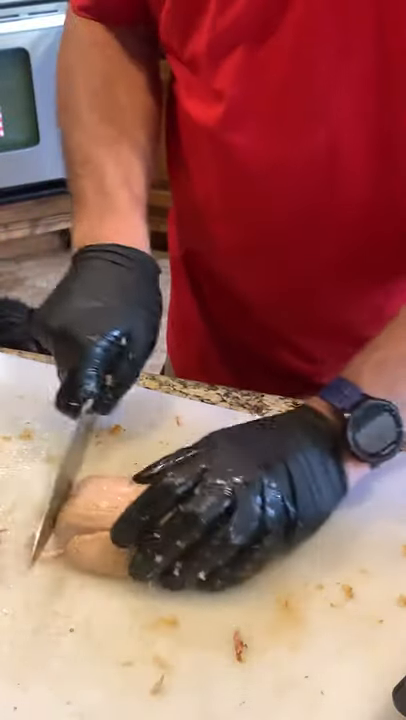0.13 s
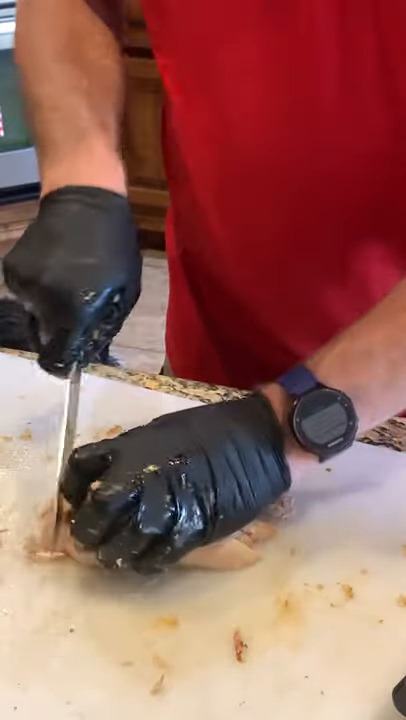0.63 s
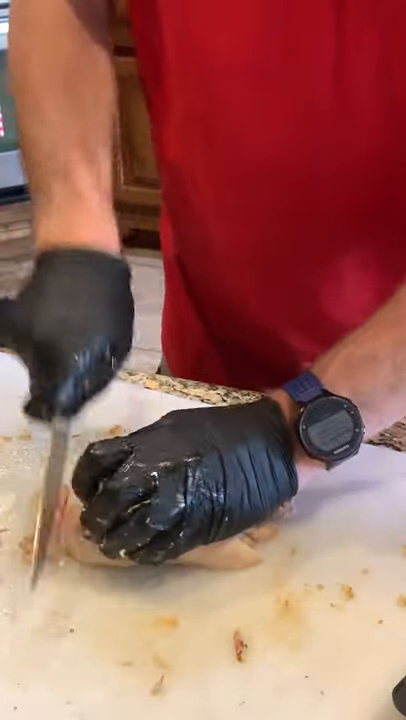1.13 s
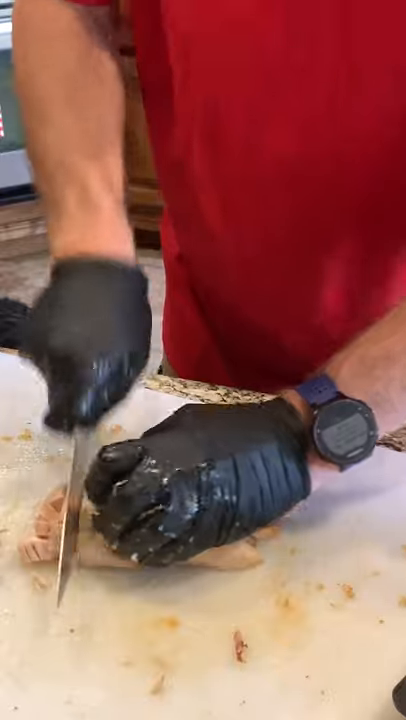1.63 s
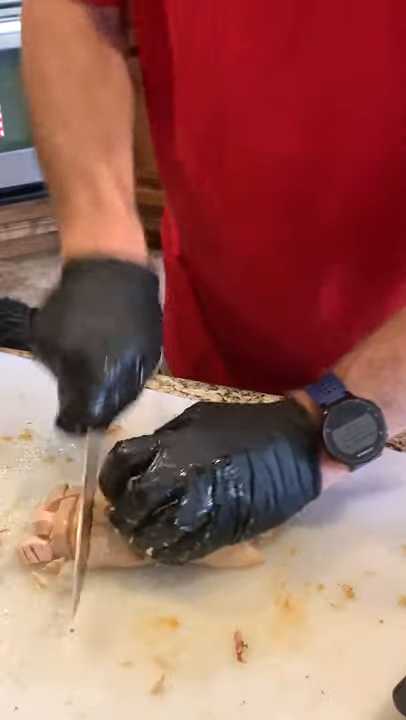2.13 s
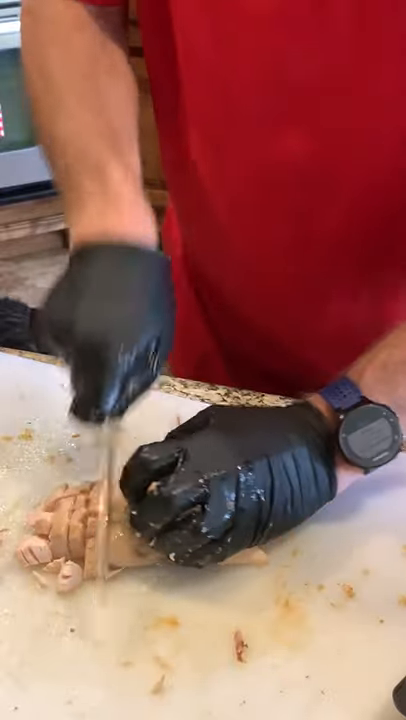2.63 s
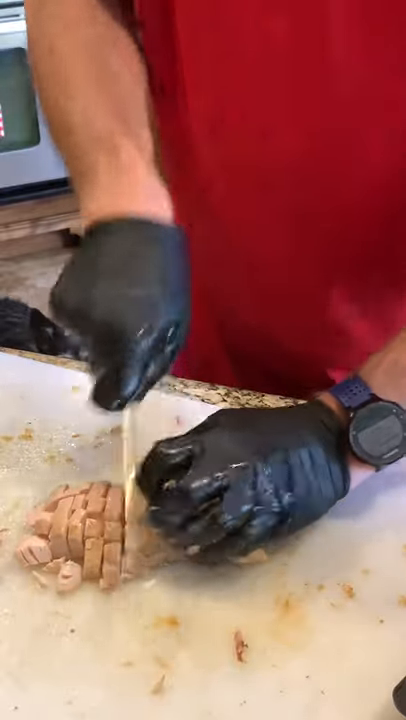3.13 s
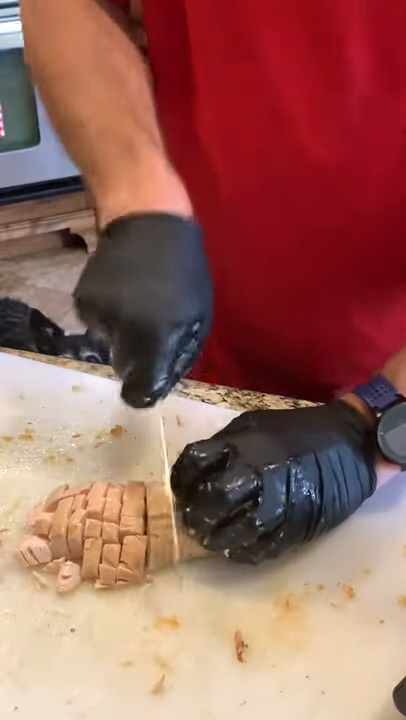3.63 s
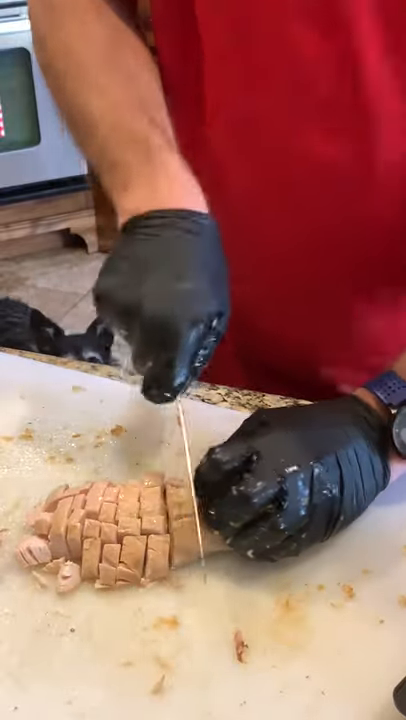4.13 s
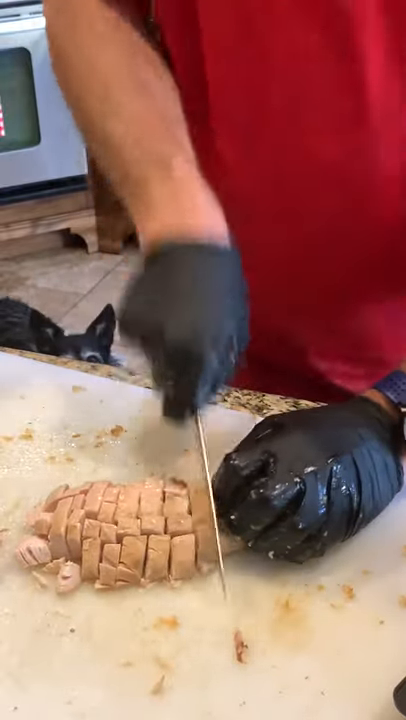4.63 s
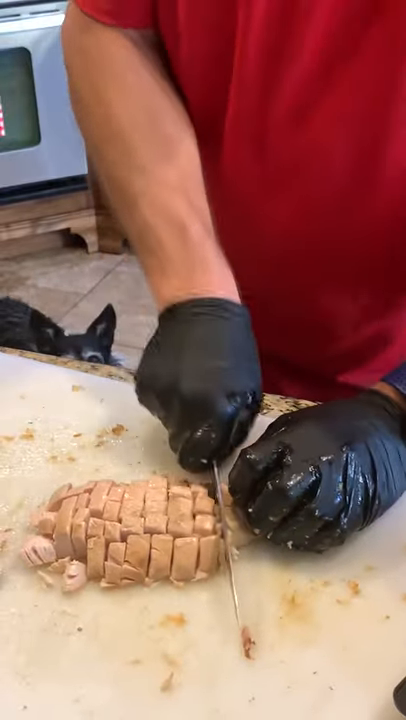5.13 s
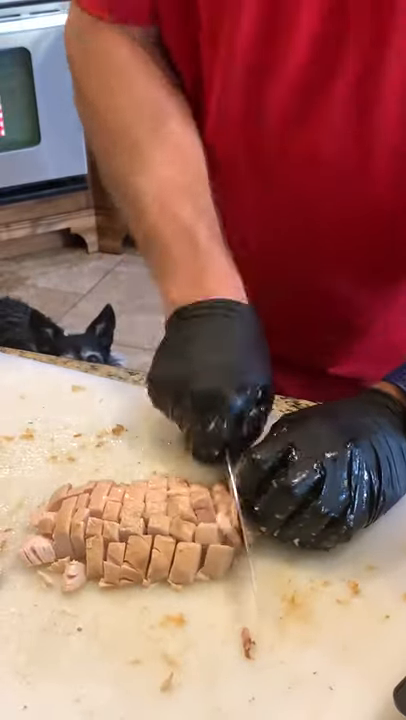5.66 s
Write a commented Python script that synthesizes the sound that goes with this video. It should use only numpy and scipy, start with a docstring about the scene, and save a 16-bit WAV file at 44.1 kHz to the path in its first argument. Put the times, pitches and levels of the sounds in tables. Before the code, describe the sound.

Close recording of dicing cooked chicken on a plastic board over a stone counter. After faint hand rustle and a thin squeak, firm clacking knocks come at an even pace to the end, the second loudest, others uneven in strength. Each slices in with a brief moist hiss, then the board settles with a faint low thump. Tiny sticky ticks fill gaps; hard walls answer briefly.

```python
"""Dicing meat on a kitchen board

A knife dices cooked meat on a plastic board lying on a stone counter in a hard-walled kitchen.
Each chop hisses through the meat (grainy noise), knocks the board (a force pulse on decaying modes) and
rings round the room (echoes and a noise tail). The counter thuds at two low modes as the board is struck
and again as it settles. Wet gloves and meat tick in noise bursts, over room rumble and faint narrow whines.
"""
import sys
import numpy as np
from scipy import signal
from scipy.fft import rfft, irfft
from scipy.io import wavfile
from scipy.ndimage import uniform_filter1d

SR = 44100
rng = np.random.default_rng(int(sys.argv[2]) if len(sys.argv) > 2 else 0)


def level_to_linear(level):
    """Convert decibel levels to linear amplitude factors, elementwise."""
    exponent = np.asarray(level, float) / 20
    return 10 ** exponent


def to_wav(s):
    """Save 16-bit WAV."""
    ch = np.atleast_2d(s).T  # columns
    pcm = np.round(np.clip(ch, -1, 1) * 32767)  # PCM
    wavfile.write(sys.argv[1], SR, pcm.astype(np.int16))


N = 254571

# Blade on board. Each row: nominal start in seconds, knock peak in dB, main board ring in Hz,
# contact in ms, edge click gain in dB against the knock peak.
CHOPS = [(0.86, -9.5, 1502, 0.66, -39.5), (1.4, -1.5, 1502, 0.33, -37), (1.888, -6, 1510, 0.57, -40.5),
         (2.378, -5.5, 1507, 0.45, -41), (2.867, -9, 1530, 0.58, -50), (3.307, -13, 1496, 0.65, -39),
         (3.777, -7, 1472, 0.43, -37.5), (4.264, -10.5, 1490, 0.55, -35.5), (4.683, -9, 1465, 0.33, -34.5),
         (5.075, -15.5, 1478, 0.63, -37), (5.585, -9.5, 1508, 0.48, -34)]
# Board modes. Each row: frequency in Hz at the usual spot, relative level in dB, t60 in seconds.
BOARD_MODES = [(224.2, -10.5, 0.036), (410, -12.5, 0.018), (533, -7.5, 0.026), (830, -17, 0.028),
               (877, -12.5, 0.013), (947, -27.5, 0.046), (950, -33.5, 0.053), (1170, -26.5, 0.011),
               (1490.6, 1, 0.0066), (1720, -11.5, .018), (1770, -5.5, 0.0073), (2280, -27.5, 0.0085),
               (2876, -22.5, 0.012)]
# First swing of each board mode: 1 towards the listener, -1 away.
MODE_SIGNS = [-1, -1, -1, -1, -1, -1, 1, 1, 1, -1, 1, 1, 1]
# Brief ring of the blade edge. Each row: frequency in Hz, level in dB before the click gain.
EDGE_MODES = [(3200, -20.5), (3800, 16), (4800, 14), (6000, 11), (7500, 5.5), (9500, -28.5), (12000, -11.5)]
# Nearest surfaces. Each row: delay in seconds, relative level in dB.
ECHOES = [(.0027, -14.5), (.0055, -12.5), (0.0101, -11), (0.0114, -4.5), (0.0211, -14), (0.023, -30.5),
          (.034, -21.5), (.045, -25)]
# Room tail. Each row: frequency in Hz, relative level in dB, t60 in seconds.
ROOM_TAIL = [(150, -24, 0.71), (270, 12, 0.45), (390, 7, 0.48), (527, -0.5, 0.66), (682, -17, 0.92),
             (958, 7.5, 0.55), (1236, -7.5, 0.71), (1550, -4, 0.73), (2060, -3.5, 0.77), (3670, 0.5, 0.41),
             (4670, -6, 0.59), (8330, 6.5, 0.11), (15000, 7, 0.15)]
# Board settling on the counter. Each row: nominal start in seconds, level in dB,
# length in seconds, deep push from 0 to 1.
SETTLES = [(0.963, -32.5, 0.088, 0.94), (1.482, -32, 0.09, 0.6), (1.986, -35, 0.089, 0.7),
           (2.459, -34.5, 0.077, 0.7), (2.914, -37, 0.084, 0.64), (3.38, -34, 0.099, 0.93),
           (3.849, -36.5, 0.069, 0.75), (4.316, -32.5, 0.075, 0.5), (4.737, -37, 0.035, 0.43),
           (5.659, -43.5, 0.074, 0.99)]
# Strokes through the meat, the first a hand shifting on it. Each row: loudest moment in seconds,
# nominal treble level in dB, swell in dB/s, fade in dB/s.
STROKES = [(0.299, -75, 58, 48), (0.927, -60.5, 144, 116), (1.435, -63, 163, 40), (1.925, -62, 158, 119),
           (2.39, -57, 214, 250), (2.861, -61.5, 153, 165), (3.326, -58, 172.5, 257),
           (3.797, -58, 225, 260), (4.278, -58.5, 259, 302), (4.7, -58.5, 246, 202), (5.098, -65, 141, 194),
           (5.616, -64.5, 209, 130)]
# Slicing spectrum. Each row: frequency in Hz, relative density in dB per Hz.
SLICE_SPECTRUM = [(1500, 5.5), (3000, 2.5), (6000, -2), (10000, -5), (16000, -13)]
# Clearest ticks of gloves and meat. Each row: start in seconds, direct peak in dB, centre in Hz,
# spectrum in dB one width above the centre.
TICKS = [(0.0483, -47.5, 5220, -9.5), (0.2283, -46, 6100, -3), (0.5437, -49, 9800, -20),
         (0.5634, -48, 5940, -11), (0.595, -58, 7750, -16), (0.631, -49.5, 6450, -6),
         (0.9353, -34, 4750, -21), (1.3706, -48.5, 5770, 2), (1.4573, -21.5, 4900, -20),
         (1.8451, -50, 7610, -14), (1.9259, -44.5, 6720, -39.5), (2.301, -49.5, 6300, -34),
         (2.321, -44.5, 5280, -5), (2.364, -36.5, 7100, -23.5), (2.487, -47, 5900, -4),
         (2.7575, -49.5, 5940, -13), (2.818, -50.5, 5860, -16), (2.982, -48, 7800, -27),
         (3.2519, -48, 5130, -7), (3.633, -50, 5600, -8), (3.7106, -48, 8560, -10), (3.756, -44, 6840, -37),
         (4.0593, -53.5, 10000, -9), (4.2002, -46.5, 6360, -17), (4.4685, -50, 7600, -9.5),
         (4.6488, -42.5, 6420, 5.5), (4.8673, -48.5, 10900, -14), (5.0259, -46, 5200, -26.5),
         (5.1008, -38.5, 5160, -40), (5.539, -55.5, 7920, -15)]
# Narrow whines. Each row: start in seconds, length in seconds, level in dB before stutter and fade,
# frequency in Hz.
WHINES = [(0.222, 0.055, -58.5, 1870), (0.292, 0.11, -60.5, 1865), (0.418, 0.12, -65, 1870),
          (0.539, 0.09, -67, 1860), (0.632, 0.14, -69.5, 1890), (2.745, 0.16, -62, 1840),
          (1.06, 0.32, -72.5, 4460), (1.6, 0.18, -70, 4430)]
# Room rumble. Each row: frequency in Hz, relative density in dB per Hz.
RUMBLE_SPECTRUM = [(12, -48), (20, -6), (113, -3), (130, -9), (172, -11), (210, -23), (228, -6.5),
                   (270, -14.5), (301, -7), (399, -17.5), (660, -22.5), (759, -21), (1190, -25),
                   (3250, -31.5), (16000, -48)]


def rms_one(x):
    """Scale to rms 1."""
    return x / np.sqrt(np.mean(x ** 2) + 1e-20)


def at_hz(points, hz, column=1):
    """Interpolate a table column on a log-frequency axis."""
    table = np.array(points)
    return np.interp(np.log(hz), np.log(table[:, 0]), table[:, column])


def coloured(points, size):
    """Noise with the given spectrum, rms 1."""
    hz = np.maximum(np.arange(size // 2 + 1) * SR / size, 1)
    spectrum = rfft(rng.standard_normal(size)) * level_to_linear(at_hz(points, hz))
    return rms_one(irfft(spectrum, size))


def add(out, sound, start_s):
    """Mix a sound in at its start time."""
    i = max(round(start_s * SR), 0)
    out[i:i + len(sound)] += sound[:N - i]


def spot_gain_db(hz, contact_ms, ring_hz):
    """Contact length and striking spot tilt the drive of low, middle and high board modes."""
    longer_ms = contact_ms - 0.46   # a longer, flatter landing drives the outer modes more
    higher_hz = ring_hz - 1510.6    # spots that ring higher drive the middle and high modes more
    if hz < 700:
        return 1.46 + 5.5 * longer_ms
    if 700 < hz < 1150:
        return 0.08 * higher_hz
    if hz > 2000:
        return 67 * longer_ms + 0.0666 * higher_hz
    return 0


def edge_click(t, rise_s=0.00015, t60_s=0.0061):
    """The blade edge rings as short bright decaying sines."""
    ring = sum(level_to_linear(db) * np.sin(2 * np.pi * hz * t) for hz, db in EDGE_MODES)
    return (1 - np.exp(-(t / rise_s) ** 2)) * level_to_linear(-60 * t / t60_s) * ring


def knocks(delay_s=0.00067, spread_db=1.4, allpass=0.915, allpass_count=6):
    """A smooth force pulse rings the board modes; the edge adds a click. One (start, sound) a chop."""
    t, sounds = np.arange(SR // 5) / SR, []
    main_hz = max(BOARD_MODES, key=lambda mode: mode[1])[0]
    click = edge_click(t)
    chance = rng.standard_normal((len(CHOPS), len(BOARD_MODES)))
    for (start_s, peak_db, ring_hz, contact_ms, click_db), luck in zip(CHOPS, chance):
        force = np.sin(np.pi * np.clip(1000 * t[:99] / contact_ms, 0, 1)) ** 2
        modes = np.zeros(len(t))
        for (hz, db, t60_s), sign, g in zip(BOARD_MODES, MODE_SIGNS, luck):
            gain_db = db + spot_gain_db(hz, contact_ms, ring_hz) + spread_db * g
            ring = np.sin(2 * np.pi * hz * ring_hz / main_hz * t)
            modes += sign * level_to_linear(gain_db - 60 * t / t60_s) * ring
        knock = np.diff(np.convolve(force, modes)[:len(t)], prepend=0)
        for _ in range(allpass_count):   # bending waves: highs arrive first, lows trail
            knock = signal.lfilter([-allpass, 1], [1, -allpass], knock)
        sound = knock / np.abs(knock).max() + level_to_linear(click_db) * click
        sounds.append((start_s + delay_s, level_to_linear(peak_db) * sound))
    return sounds


def room_response(tail_db=-32, build_s=0.002, echo_hz=1600, length_s=0.8, alike=0.45):
    """Dull near echoes, then a dense tail whose bands die at their own rates; partly alike between spots."""
    t = np.arange(round(length_s * SR)) / SR
    edges_hz = 100 * 2 ** (np.arange(23) / 3)   # third octaves
    white = rng.standard_normal((2, len(CHOPS) + 1, len(t)))
    # in the last response both parts are the same noise, so its tail is stronger
    white = np.sqrt(alike) * white[:, :1] + np.sqrt(1 - alike) * white[:, ::-1]
    tail = 0
    for k, (low_hz, high_hz) in enumerate(zip(edges_hz, edges_hz[1:])):
        hz = np.sqrt(low_hz * high_hz)
        band_filter = signal.butter(2, [low_hz, high_hz], "band", fs=SR, output="sos")
        band = signal.sosfilt(band_filter, white[k % 2])
        tail = tail + band * level_to_linear(at_hz(ROOM_TAIL, hz) - 60 * t / at_hz(ROOM_TAIL, hz, column=2))
    echoes = np.zeros(len(t))
    for delay_s, db in ECHOES:
        echoes[round(delay_s * SR)] += level_to_linear(db)
    echoes = signal.lfilter(*signal.butter(1, echo_hz, fs=SR), echoes)
    return echoes + level_to_linear(tail_db) * tail * (1 - np.exp(-(t / build_s) ** 2))


def kitchen(small, chop_room_db=-2.5, small_room_db=-8):
    """Sum chops and small sounds, each direct and convolved with a room response."""
    *chop_rooms, small_room = room_response()
    out = small + level_to_linear(small_room_db) * signal.fftconvolve(small, small_room)[:N]
    for (start_s, sound), room in zip(knocks(), chop_rooms):
        add(out, sound, start_s)
        add(out, level_to_linear(chop_room_db) * signal.fftconvolve(sound, room), start_s)
    return out


def thuds(rise_s=0.008, fall_s=0.021, fade_s=0.11, push_s=0.0096, partner_ratio=1.25, partner_db=-9):
    """The counter hums at two close low modes while the board presses; a deeper push starts each thud."""
    out, t = np.zeros(N), np.arange(SR // 4) / SR
    # strike level follows the chop: 0.61 dB per dB, -33.5 dB at a 0 dB chop
    strikes = [(s, -33.5 + 0.61 * db, 116.1, 0.078, 0.1) for s, db, *_ in CHOPS]
    settles = [(s, db, 109.5, length_s, push) for s, db, length_s, push in SETTLES]
    for start_s, level_db, hz, length_s, push in strikes + settles:
        release = 1 + np.exp((t - length_s) / fall_s)
        hold = (1 - np.exp(-(t / rise_s) ** 2)) * np.exp(-t / fade_s) / release
        partner = level_to_linear(partner_db) * np.sin(2 * np.pi * partner_ratio * hz * t)
        hum = np.sin(2 * np.pi * hz * t) + partner
        shove = push * t / push_s * np.exp(1 - t / push_s) * np.sin(1.3 * np.pi * hz * t)
        add(out, level_to_linear(level_db) * (hold * hum + shove), start_s - rise_s)
    return out


def squash(level_db=-41, lead_s=0.023, centre_hz=300):
    """Meat is pressed flat: a soft low puff swells until the chop; level is relative to the chop."""
    out, t = np.zeros(N), np.arange(round(lead_s * SR)) / SR
    spectrum = [(centre_hz / 3, -25), (centre_hz, 0), (centre_hz * 4, -25)]
    for start_s, peak_db, *_ in CHOPS:
        puff = coloured(spectrum, SR // 10)[:len(t)]
        add(out, level_to_linear(peak_db + level_db) * t / lead_s * puff, start_s - lead_s)
    return out


def stroke_effort(hands_db=-80.5, cut_end_db_per_s=405, draw_db=-14, draw_db_per_s=40, round_s=0.005):
    """Gains before and after each stroke's peak: swell, fast fade, slow fade as the blade is drawn out."""
    t = np.arange(N) / SR
    cutting, after_cut = level_to_linear(hands_db), 0   # fingers never quite still
    for peak_s, db, swell_db_per_s, fade_db_per_s in STROKES:
        late_s = t - peak_s
        before_db = swell_db_per_s * np.maximum(-late_s, 0)
        cutting = cutting + level_to_linear(db - before_db - cut_end_db_per_s * np.maximum(late_s, 0))
        fade = level_to_linear(-fade_db_per_s * np.abs(late_s))
        withdraw = level_to_linear(draw_db - draw_db_per_s * np.abs(late_s))
        after_cut = after_cut + (late_s > 0) * level_to_linear(db) * (fade + withdraw)
    return uniform_filter1d([cutting, after_cut], size=round(2 * round_s * SR))   # rounds the tops


def slicing(grains_per_s=500, hiss=0.57, treble_hz=6000, after_cut_hz=5800, after_db=3.5):
    """Fibres part as dense uneven grains on a soft hiss, duller past each stroke's peak."""
    grain_sizes = level_to_linear(3 * np.minimum(rng.exponential(1, N), 4))
    grains = (rng.random(N) < grains_per_s / SR) * grain_sizes
    rough = rms_one(signal.lfilter([1], [1, -0.93], grains))
    texture = hiss + (1 - hiss) * rough
    bright = coloured(SLICE_SPECTRUM, N) * texture
    dull = coloured(SLICE_SPECTRUM, N) * texture
    dull = signal.lfilter(*signal.butter(1, after_cut_hz, fs=SR), dull)
    treble = signal.sosfilt(signal.butter(4, treble_hz, "high", fs=SR, output="sos"), bright)
    cutting, after_cut = stroke_effort()
    # stroke levels refer to the treble of the bright noise
    return (cutting * bright + level_to_linear(after_db) * after_cut * dull) / np.std(treble)


def ticks(t60_s=0.014, width_octaves=0.98, faint_count=45, faint_db=-60.5, faint_spread_db=6.0):
    """Gloves and meat tick as milliseconds of dying noise round a centre; fainter ones fall at random."""
    out, t = np.zeros(N), np.arange(SR // 20) / SR
    faint = [(when * N / SR, faint_db + faint_spread_db * (2 * size - 1), 9500 * 2 ** (pitch - 0.5), -12)
             for when, size, pitch in rng.random((faint_count, 3))]
    width = 2 ** width_octaves
    for start_s, peak_db, hz, upper_db in [*TICKS, *faint]:
        spectrum = [(hz / width ** 2, -34), (hz / width, -20), (hz, 0), (hz * width, upper_db)]
        tick = level_to_linear(-60 * t / t60_s) * coloured(spectrum, len(t))
        add(out, level_to_linear(peak_db) * tick / np.abs(tick).max(), start_s)
    return out


def narrow_noise(hz, size, width=0.065):
    """Noise in a narrow resonance; width is a share of its frequency."""
    spectrum = [(hz * (1 - 2 * width), -30), (hz * (1 - width / 2), 0),
                (hz * (1 + width / 2), 0), (hz * (1 + 2 * width), -30)]
    return coloured(spectrum, SR // 2)[:size]


def whines(stutter_hz=30, stutter_db=3.5, ramp_s=0.0051, fade_db=-7.5, octave_db=-11):
    """Narrow noise, the low ones with a faint octave; each starts quickly, stutters and fades."""
    out = np.zeros(N)
    stutter = level_to_linear(stutter_db * coloured([(stutter_hz, 0), (3 * stutter_hz, -40)], N))
    for start_s, length_s, db, hz in WHINES:
        t = np.arange(round(length_s * SR)) / SR
        ramps = np.minimum(np.minimum(t, length_s - t) / ramp_s, 1)
        whine = narrow_noise(hz, len(t))
        if hz < 3000:
            whine = whine + level_to_linear(octave_db) * narrow_noise(2 * hz, len(t))
        add(out, ramps * level_to_linear(db + fade_db * t / length_s) * whine, start_s)
    return out * stutter


def rumble(level_db=-58):
    """Steady room rumble: noise weighted to the lows."""
    return level_to_linear(level_db) * coloured(RUMBLE_SPECTRUM, N)


def scene():
    """Chops and ticks in their room, thuds, squash, slicing and the background."""
    return (kitchen(ticks()) + thuds() + squash() + slicing() + whines() + rumble())[None]


def top_cut(x):
    """Nothing passes above the cut-off."""
    return signal.sosfilt(signal.butter(12, 16500, fs=SR, output="sos"), x)


def record(dry, mic_low_hz=30):
    """The microphone drops the deepest bass."""
    thinned = signal.sosfilt(signal.butter(2, mic_low_hz, "high", fs=SR, output="sos"), dry)
    return top_cut(thinned)


dry = scene()
out = record(dry)
to_wav(out)
```